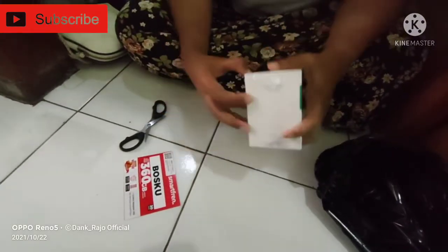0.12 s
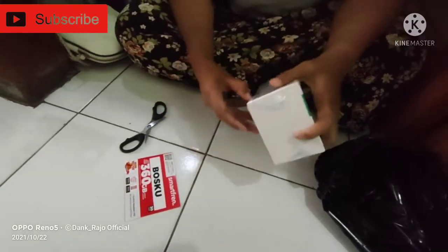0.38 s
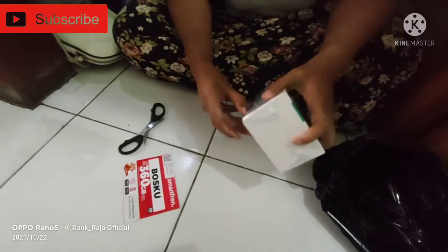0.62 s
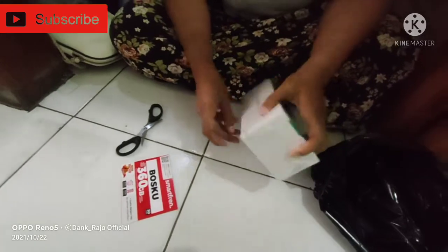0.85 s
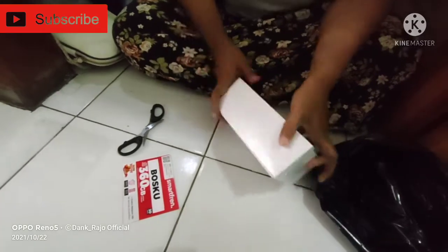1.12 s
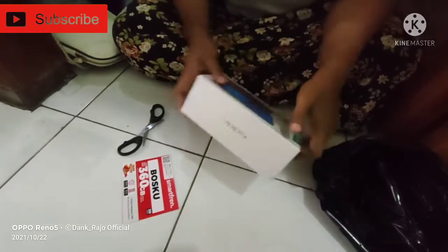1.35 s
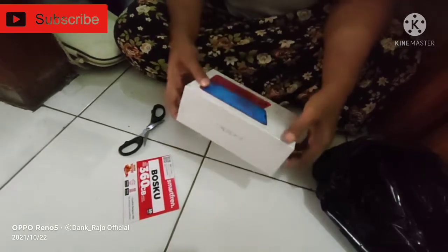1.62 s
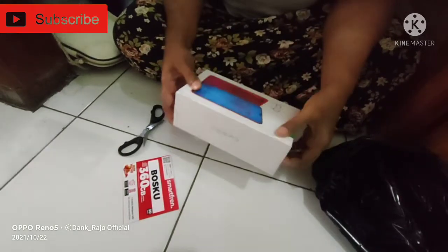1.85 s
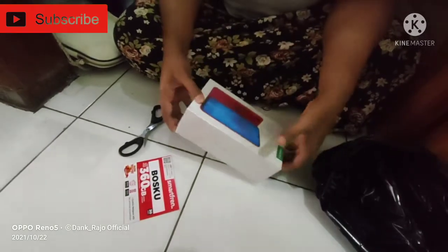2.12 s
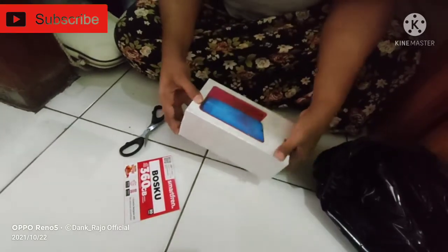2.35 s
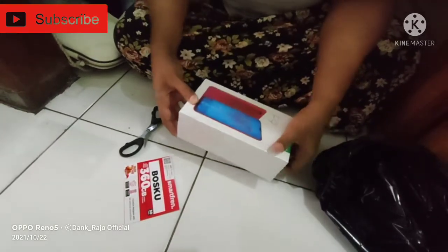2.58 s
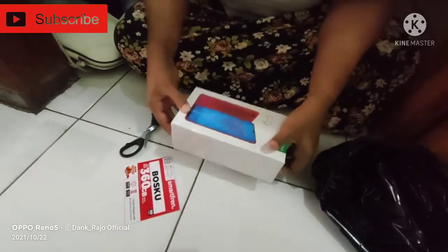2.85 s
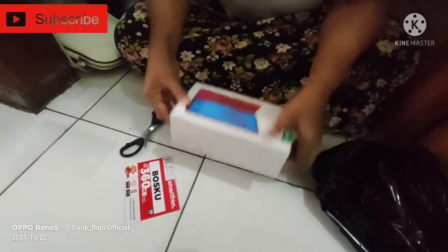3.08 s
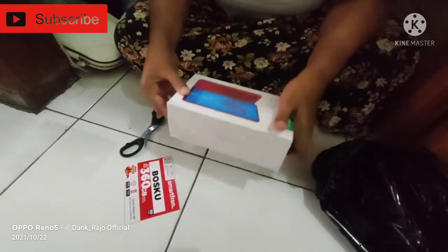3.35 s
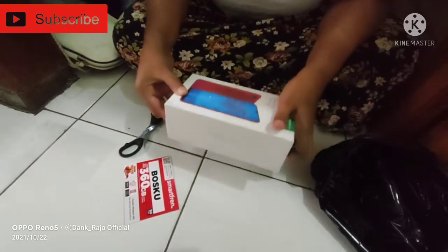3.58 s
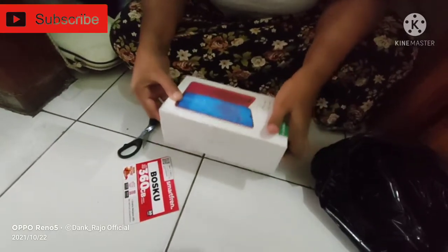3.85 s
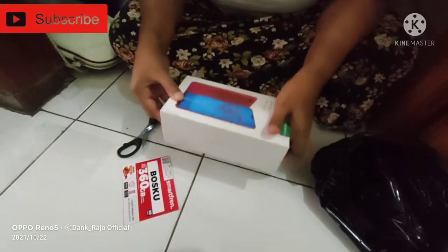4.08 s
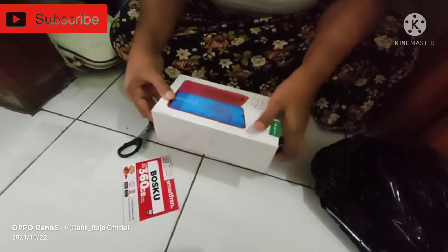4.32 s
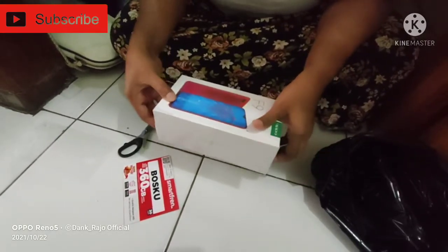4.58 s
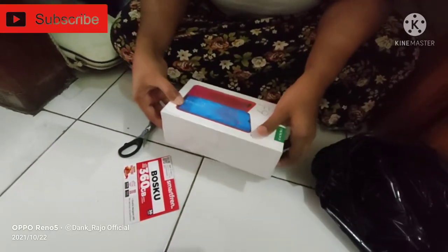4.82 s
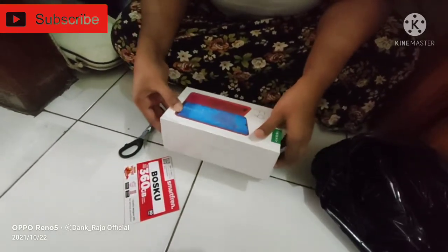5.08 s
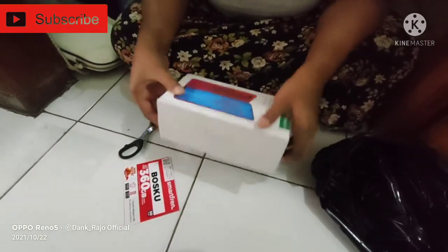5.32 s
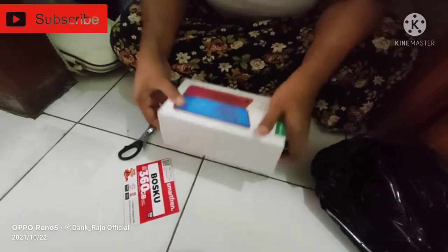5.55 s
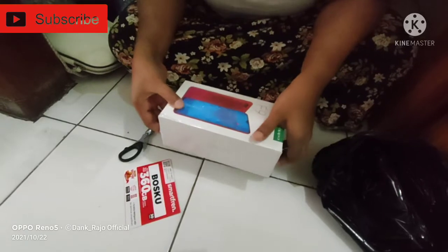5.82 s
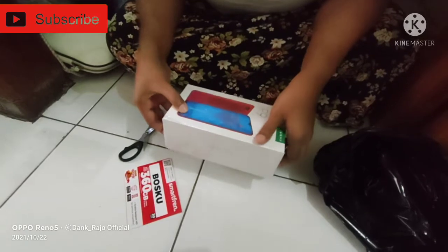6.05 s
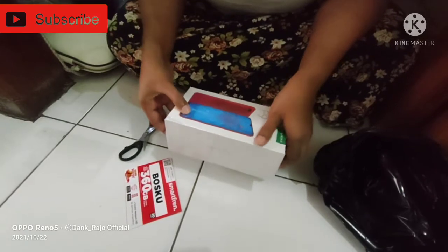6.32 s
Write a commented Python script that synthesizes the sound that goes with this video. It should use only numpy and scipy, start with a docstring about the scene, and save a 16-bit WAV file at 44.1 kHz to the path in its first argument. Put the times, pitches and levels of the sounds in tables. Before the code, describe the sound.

Fingers slip and tap on a light wrapped carton indoors, the card knocking hollowly and its film snapping brightly over faint hiss.

```python
"""A small film-wrapped cardboard box, turned by hand over a tiled floor half a metre from a two-port phone.
Quiet hiss and a faint hum lie under it all. Light slips and taps open, with a firm knock near 1.5 s;
from 2.5 s skin stutters along the ringing card, up to one loud crackle of the wrap at 3.8 s. After a lull come
the hardest knock and a bright crackle at 4.8 s, then scattered crackles and a last tap at 6.3 s.
Knocks ring panel modes, slips drive them with noise, the film ticks; hard walls answer after a short gap."""
import sys
import numpy as np
from scipy import signal
from scipy.fft import rfft, irfft
from scipy.io import wavfile
from scipy.ndimage import uniform_filter1d, map_coordinates

SR = 44100
rng = np.random.default_rng(int(sys.argv[2]) if len(sys.argv) > 2 else 0)


def elevation(decibels):
    """Turn decibel levels (scalar or array-like) into linear amplitude ratios."""
    levels = np.asarray(decibels, float)
    return 10 ** (levels / 20)


def int16_out(signal):
    """Quantize to a 16-bit WAV file."""
    q = np.round(np.clip(np.atleast_2d(signal).T, -1, 1) * 32767)
    wavfile.write(sys.argv[1], SR, q.astype(np.int16))


N = 283563
HZ = np.fft.rfftfreq(N, 1 / SR)
TIME = np.arange(N) / SR

# Room hiss spectrum. Each row: frequency in Hz, relative density in dB per Hz.
HISS_SPECTRUM = [(12, -53), (20, -1.5), (96, -3.5), (168, 3.5), (422, -10.5), (499, -5.5), (542, -14.5),
                 (849, -17), (1120, -11), (1480, -14.5), (2750, -8.5), (5850, -22.5), (8180, -36.5),
                 (13900, -36.5), (16000, -71)]
# Likeness of the hiss at the two ports. Each row: frequency in Hz, likeness from 0 to 1.
HISS_LIKENESS = [(60, 0.4), (130, 0.97), (640, 0), (1400, 0), (15000, 0.2)]
# Tile and wall reflections. Each row: band centre in Hz, relative energy in dB, t60 in seconds.
WALL_BANDS = [(161, -20, 0.36), (440, -7.5, 0.42), (1230, -1, 0.11), (3000, -5.5, 0.29), (7300, -8.5, 0.37),
              (12000, -8, 0.16), (14300, -34, 0.046)]
# Level difference between the ports. Each row: frequency in Hz, left minus right in dB.
PORT_DIFFERENCE = [(60, -0.5), (110, 0.0), (200, 0.5), (380, 1.0), (700, 0.0), (1290, 0.5), (2380, -5.5),
                   (4400, -4.5), (8120, -1.0), (15000, -6.0)]
# Faint narrow swishes. Each row: middle in seconds, half length in seconds, level at the middle in dB, centre in Hz.
SWISH_EVENTS = [(1.077, 0.067, -58.5, 2470), (1.207, 0.07, -56, 3100), (1.173, 0.1, -60, 3700),
                (1.63, 0.066, -54, 3860), (4.047, 0.47, -58, 3500), (5.282, 0.058, -65, 3000),
                (5.349, 0.035, -51.5, 3720), (5.68, 0.047, -60, 4200), (6.25, 0.041, -57.5, 5400)]
# Rustling film spectrum. Each row: frequency in Hz, relative density in dB per Hz.
RUSTLE_SPECTRUM = [(2060, -22), (3500, -19), (5000, 8), (6500, 7.5), (8500, -10), (10900, -1.5),
                   (13800, -9), (16000, -15)]
# Scuffed card face spectrum. Each row: frequency in Hz, relative density in dB per Hz.
SCUFF_SPECTRUM = [(760, 1), (1400, 0.5), (2630, 1.5), (3610, 2.5), (5000, -3), (7000, -12.5), (9000, -31),
                  (13000, -19), (19800, -58)]
# Fingers dragging the box about. Each row: time in seconds, rumble level in dB.
DRAG_LEVEL = [(0, -68), (.29, -51), (.45, -59), (1.4, -58), (1.5, -38), (1.63, -56.5), (1.8, -51),
              (2.0, -60), (2.45, -58.5), (2.6, -49), (2.8, -45.5), (3.0, -47), (3.3, -39.5), (3.45, -49.5),
              (3.6, -47), (3.79, -56.5), (3.95, -60.5), (4.72, -58.5), (4.83, -29), (4.92, -44),
              (5.02, -45.5), (5.1, -38), (5.23, -60), (5.5, -58), (6.0, -69), (6.16, -56.5), (6.43, -65)]
# Strokes of skin over the wrap, swelling and fading.
# Each row: middle in seconds, half length in seconds, scuff level in dB, rustle level in dB.
STROKE_EVENTS = [(0.047, 0.052, -58.5, -64.5), (0.442, 0.062, -50.5, -49.5), (0.565, 0.07, -56, -58),
                 (0.855, 0.25, -71, -62.5), (1.337, 0.073, -47, -54.5), (1.568, 0.2, -66, -63),
                 (2.02, 0.13, -58, -59), (2.316, 0.042, -51, -51), (2.565, 0.099, -59, -58.5),
                 (2.72, 0.18, -69.5, -83), (3.002, 0.095, -61, -81), (3.26, 0.13, -63, -61),
                 (3.61, 0.17, -61, -67.5), (4.242, 0.13, -53, -99), (4.806, 0.025, -37, -58),
                 (4.864, 0.032, -57, -66), (5.006, 0.0093, -48, -45), (5.067, 0.019, -44, -39.5),
                 (5.595, 0.095, -57.5, -69)]
# Panel modes of the box. Each row: frequency in Hz, relative level in dB, free t60 in seconds.
BOX_MODES = [(163, -16, 0.085), (201, 9, 0.12), (257.8, 0.5, 0.032), (300.5, -5, 0.15), (371, -12.5, 0.17),
             (429, -12, 0.09), (446, -13.5, 0.12), (640, -4.5, 0.04), (663, 1, 0.026), (764, -16.5, 0.048),
             (939, -3, 0.018), (1100, -16.5, 0.11), (1734, -6.5, 0.0066), (1750, -28, 0.035),
             (2630, -6.5, 0.012), (3000, -19, 0.067)]
# Skin slipping on the card. Each row: start in seconds, rumble peak in dB, low panel pitch in Hz,
# relative lid level in dB, time to the strongest push in ms (held within 1 to 20).
SLIP_EVENTS = [(0.064, -39, 207, -41, 8.4), (0.411, -41, 185, -3, 9.6), (0.616, -39.5, 242, -8, 12.4),
               (1.287, -37.5, 249, 14, 14), (1.379, -29, 209, -2.5, 4.8), (1.394, -30, 203, -3, 3.7),
               (1.689, -38.5, 200, 12, 2.7), (1.712, -41, 198, -7, 5.5), (1.754, -36, 196, -18, 4.6),
               (1.769, -27, 210, 1, 4.05), (1.801, -40.5, 201, 3, 5), (2.56, -31.5, 238, 3, 4.1),
               (2.599, -36, 210, -6, 4), (2.612, -26.5, 220, -19, 5.8), (2.621, -20.5, 209.6, -8.5, 4.4),
               (2.642, -32, 214, -15, 5), (2.681, -29, 237, -9, 6.7), (2.727, -27, 202, -13, 3.7),
               (2.737, -22.5, 204, -9, 7.9), (2.785, -29, 207, -6, 4.1), (2.827, -41, 167, -5, 2.8),
               (2.838, -22, 182, -15.5, 4.8), (2.899, -35.5, 150, -16, 1.6), (2.932, -28, 161, -12, 8.3),
               (2.962, -33, 180, -3, 2.7), (3.04, -26, 213, -4.5, 4.2), (3.066, -31, 202, -13, 3.5),
               (3.1, -35.5, 202, -7, 4.5), (3.149, -21, 228, -9.5, 13.7), (3.258, -28.5, 200, -11.5, 11),
               (3.28, -20, 229, -8, 6.9), (3.31, -39, 201, -3, 3.6), (3.345, -41, 198, -4, 3.6),
               (3.378, -33.5, 194, -16, 6.7), (3.389, -22.5, 201, -9, 4.7), (3.409, -34, 197, -24, 4),
               (3.457, -39, 199, 10, 4.2), (3.495, -23.5, 201, -11, 4.5), (3.509, -26.5, 206, -2.5, 3.6),
               (3.559, -35, 205, -3, 8.7), (3.616, -32, 184, -10, 4.8), (3.627, -33.5, 154.4, -24, 4.5),
               (3.69, -35.5, 168, 13, 5.5), (4.281, -47, 218, 12, 5.2), (4.402, -45.5, 218, 14, 15),
               (4.44, -46.5, 218, 11, 7.1), (4.751, -33.5, 190, -15, 30), (4.784, -21.5, 201, -7, 19.4),
               (4.849, -31, 198, 0, 6.8), (4.874, -52, 230, -8, 5.4), (4.933, -21.5, 189, -9, 4.8),
               (4.949, -23, 201, -13.5, 4.7), (5.048, -23, 212, -11, 5), (5.069, -24, 150, -16, 4.1),
               (5.094, -33, 201, -32, 5.4), (5.151, -36, 151, -19, 3.7), (6.122, -41, 226, -9, 5.6),
               (6.148, -45, 205, -13, 4.1)]
# Buckles of the wrap. Each row: start in seconds, peak in dB, centre in Hz, then relative levels in dB of
# the body near 1 kHz, the dull part at 2 kHz and the bright part.
CRACKLE_EVENTS = [(0.044, -45, 5240, -20, -15, -17), (0.221, -33.5, 4600, -28, -26, 0),
                  (0.2383, -21.5, 4120, -5, 1, -7), (0.415, -26.5, 3730, -32, -28, -4),
                  (0.468, -33, 4800, -22, -11, -5), (0.609, -34, 4750, -4, 13, -35),
                  (0.663, -41.5, 5170, -20, -15, 2), (0.772, -33, 5940, -25, -9, 6),
                  (0.903, -30.5, 3500, -30, -28, -4.5), (0.927, -38, 5200, -20, -4, -9),
                  (0.939, -36, 2880, 21, 19, -26), (1.008, -40, 3300, -25, -25, -20),
                  (1.263, -17, 4650, -1, -0.5, -2.5), (1.384, -27.5, 3300, -20, -26, -9),
                  (1.394, -21.5, 4600, 8, -6, -5), (1.468, -21.5, 3050, 15, -7, -11),
                  (1.714, -36, 3570, -17, -19, -12), (1.9067, -36, 3600, -19, -21, -10),
                  (2.05, -43, 5940, -25, -20, 4), (2.122, -40.5, 3870, -26, -24, 21),
                  (2.37, -31.5, 5430, -19, -4, -1), (2.4505, -36, 4900, 5, -1, -9),
                  (2.493, -33.5, 4700, 0, -3, -10), (2.54, -30.5, 5040, -6, 1, -3),
                  (2.586, -49, 5030, -20, -10, -11), (2.695, -35.5, 5350, -8, 2, -1),
                  (2.794, -29, 6000, -10, -3, -2), (2.8874, -23.5, 5700, -14, -2, 0.5),
                  (2.9755, -36, 3080, -14, -14, -3), (2.9947, -27, 5630, -29, -12, -7),
                  (3.016, -34, 5450, -12, 1, -18), (3.0629, -34.5, 5930, -33, -24, -2),
                  (3.118, -24, 5840, -15, -3, -9), (3.133, -28, 5450, -17, -11, -12),
                  (3.2286, -28, 2900, 14, -2, -29), (3.5694, -33.5, 2400, 0, 4, -11),
                  (3.634, -37.5, 5900, -17, 1, -5), (3.793, -7.5, 2940, -5, -1.5, -4.5),
                  (3.9724, -39, 3370, -19, -15, -25), (4.1668, -40, 5100, -15, -13, 0),
                  (4.284, -49, 5600, -8, -15, -11), (4.428, -44, 3040, -2, -4, -10),
                  (4.557, -26.5, 5500, -11, 0, 7.5), (4.784, -34, 3500, -7, -3, -9),
                  (4.809, -31, 3070, -9, -10, -14), (4.829, -24, 6140, 0, 0, 22),
                  (4.835, -10, 5960, -7, -2, -2.5), (4.994, -37, 3360, -24, -22, -4),
                  (5.045, -39, 4450, 4, -8, -5), (5.097, -26.5, 4820, 5, 1, -11.5),
                  (5.151, -35, 3200, -30, -28, -14), (5.231, -50, 5970, -27, -20, 3),
                  (5.27, -56, 6000, -25, -19, 5), (5.333, -59, 6100, -25, -27, -3),
                  (5.4, -40, 3400, 8, -5, -15), (5.413, -42, 2000, 0, 2, -12),
                  (5.4328, -21, 5000, -9, -17, -14), (5.6493, -32.5, 4630, 8.5, -16, -5.5),
                  (5.99, -42, 5460, -18, -10, -7), (6.0133, -18, 3380, -18, 0.5, -10.5),
                  (6.127, -38, 3140, 6, 0, -12), (6.139, -39.5, 3000, 5, 2, -16),
                  (6.2599, -30, 3270, 8, 1, -18)]
# Finger taps. Each row: time in seconds, peak in dB, low panel pitch in Hz,
# relative side-panel level in dB, relative lid level in dB.
TAP_EVENTS = [(0.176, -34.5, 247, 15, 6), (0.244, -26.5, 195, -4, -13.5), (0.937, -33, 160, -17, 0),
              (1.468, -13.5, 201, -3, -14), (1.579, -17.5, 216, 5.5, -8.5), (1.946, -40, 205, -9, -13),
              (3.165, -18, 198, -0.5, -6), (3.226, -35, 217, -13, -15), (3.973, -38.5, 145, 2, -1),
              (4.8121, -10.5, 268, 4, -3.5), (4.834, -16.5, 213, -3.5, -32), (6.259, -25.5, 216, 0.5, -2.5)]

HISS_DB, HUM_HZ, HUM_DB = -54.5, 497, -64  # before their slow wavering
WALL_GAP_S, WALL_RISE_S = 0.0052, 0.0047
ECHO_S, ECHO_DB = 0.018, -16
PORT_LEAD_S = 0.00039  # treble of the film and handling reaches the left port first
WANDER_DB, WANDER_S = 1.8, 0.00004  # port level difference and lag per unit of the fingers' wandering
SWISH_OCTAVES = 0.16
STRAY_PER_S, STRAY_DB = 6.9, -52  # rate, middle of the peaks' range
DRAG_SCUFF_DB = -18  # the face's scuff against the dragging rumble
GRIP_DETUNE, GRIP_DB = 0.02, 3  # each grip shifts (as a share) and weights the panels a little
HELD_T60_S = 0.07  # the hand stills the side panels and lid within this
THUD_DB = -11.5  # gain of the jolt below the lowest panel
SLIP_SCUFF_DB = -13  # scuff peak against the rumble peak
SCUFF_DRAG = 2.2  # the scuff fades this many times more slowly than the push
FRAY_MS = 2.5
SHOULDER = 0.4  # share of the bright part's level reached at 1.6 times the centre
BUCKLE_DB, BUCKLE_OCTAVES = 2.5, 0.16  # extra strength around each buckle's centre
PING_DB, PING_MS = -14, 1.1  # least ping against the tick, decay time
CONTACT_MS, YIELD_S = 0.85, 0.00216  # push of a fingertip; the pad yields first
KNOCK_DB, KNOCK_MS, KNOCK_HZ = -20.5, 6.1, 1220  # dry crack of the card, peak against the ring


def level(x, db):
    """Set the rms level."""
    return x * elevation(db) / np.sqrt(np.mean(x ** 2))


def along(points, hz):
    """Read a (Hz, value) table on a log-frequency axis."""
    at, value = np.transpose(points)
    return np.interp(np.log(hz + 1), np.log(at + 1), value)


def colour(x, gain):
    """Multiply the spectrum."""
    return irfft(rfft(x) * gain, N)


def band(x, hz, octaves):
    """Bell-shaped band on a log axis."""
    f = np.fft.rfftfreq(len(x), 1 / SR) + 1
    bell = np.exp(-0.5 * (np.log2(f / hz) / octaves) ** 2)
    return irfft(rfft(x) * bell, len(x))


def add(track, s, sound, peak_db):
    """Mix a sound in at a time with a given peak."""
    i = int(s * SR)
    track[i:i + len(sound)] += (sound * elevation(peak_db) / np.abs(sound).max())[:N - i]


def walk(rate):
    """Random levels held 1 / rate s and slewed; spread near 1."""
    k = int(SR / rate)
    held = np.repeat(rng.standard_normal(N // k + 1), k)
    return uniform_filter1d(held, k)[:N]


def grains(per_s, spread_db):
    """Sparse clicks, most of them small and a few large."""
    when, sign, size = rng.random((3, N))
    return (when < per_s / SR) * np.sign(sign - 0.5) * elevation(-spread_db * np.log(size + 1e-4))


def room():
    """Room hiss that drifts slowly, each octave on its own, alike in the bass only, and a thin wavering hum."""
    alike = np.clip(along(HISS_LIKENESS, HZ), 0, 1)
    spectrum = elevation(along(HISS_SPECTRUM, HZ))
    mid = colour(rng.standard_normal(N), spectrum * np.sqrt(1 + alike))
    side = colour(rng.standard_normal(N), spectrum * np.sqrt(1 - alike))
    octave = np.log2(HZ + 1)
    hiss = np.zeros((2, N))
    for k in range(3, 15):
        window = np.clip(1 - np.abs(octave - k), 0, 1)
        ports = np.array([colour(x, window) for x in (mid + side, mid - side)])
        hiss += elevation(0.11 * walk(2.9)) * ports
    hum_phase = 2 * np.pi * np.cumsum(HUM_HZ + 4.26 * walk(6.6)) / SR
    hum = np.sin(hum_phase) * elevation(HUM_DB + 2.0 * walk(7.0))
    return level(hiss, HISS_DB) * elevation(walk(1.58)) + hum


def walls(x):
    """Dense reflections from tiles and walls set in after a gap; each channel hears its own."""
    t = TIME[:SR // 2]
    rise = np.clip((t - WALL_GAP_S) / WALL_RISE_S, 0, 1)
    shared = rng.standard_normal(len(t))
    out = []
    for own in rng.standard_normal((2, len(t))):
        tail = np.zeros(len(t))
        for hz, db, t60 in WALL_BANDS:
            # long waves reach both ports more alike
            noise = shared + 0.67 * own if hz < 1000 else own
            decay = 1000. ** (-t / t60) / np.sqrt(t60 * SR)
            tail += elevation(db) * decay * band(noise, hz, 0.55)
        out.append(signal.fftconvolve(x, rise * tail * 4)[:N])
    return np.array(out)


def swishes():
    """Short swells of noise in a narrow band."""
    out = np.zeros(N)
    for s, half_s, db, hz in SWISH_EVENTS:
        noise = level(band(rng.standard_normal(N), hz, SWISH_OCTAVES), db)
        out += noise * np.exp(-((TIME - s) / half_s) ** 2)
    return out


def strays():
    """Faint lone ticks of the settling film: decaying noise bursts at random moments."""
    out = np.zeros(N)
    for moment, size, pitch in rng.random((int(STRAY_PER_S * N / SR), 3)):
        tick = np.exp(-TIME[:512] / 0.0048) * rng.standard_normal(512)
        tick = band(tick, 4500 * 2 ** (1.7 * pitch), 1.0)
        add(out, moment * (N / SR - 0.02), tick, STRAY_DB + 8 * (size - 0.5))
    return out


def ring(low_hz, side_db, lid_db):
    """The box's answer to a push: decaying modes; the grip sets the low pitch and each panel's share."""
    t = TIME[:SR // 8, None]
    hz, db, t60 = np.transpose(BOX_MODES)
    hz = np.where(hz < 230, hz * low_hz / hz[1], hz)
    db = db + along([(230, 0), (300, side_db + 11.5), (450, side_db + 4.0), (600, lid_db + 16.0)], hz)
    turn, detune, weight = rng.standard_normal((3, len(hz)))
    hz = hz * (1 + GRIP_DETUNE * detune)
    db = db + GRIP_DB * weight
    held_t60 = np.where(hz > 250, np.minimum(t60, HELD_T60_S), t60)
    modes = elevation(db) * np.sin(2 * np.pi * hz * t + 0.13 * turn) * 1000. ** (-t / held_t60)
    panels = modes.sum(axis=1)
    # the whole box jolts below its lowest panel, where so small a box radiates little
    thud = signal.sosfilt(signal.butter(2, (48, 85), "band", fs=SR, output="sos"), panels)
    radiated = signal.sosfilt(signal.butter(4, 135, "high", fs=SR, output="sos"), panels)
    return radiated + elevation(THUD_DB) * thud


def handling():
    """Dragging skin excites the box modes with grains; strokes scuff the face and make the film tick densely."""
    drag = sum(signal.fftconvolve(grains(700, 3.27), ring(hz, -0.49, -9.5))[:N] for hz in (160, 200, 225))
    scuff = colour(grains(3500, 3.6) * elevation(3 * walk(30)), elevation(along(SCUFF_SPECTRUM, HZ)))
    ticks = colour(grains(2600, 3.7) * elevation(4 * walk(30)), elevation(along(RUSTLE_SPECTRUM, HZ)))
    s, half_s, scuff_db, rustle_db = np.transpose(STROKE_EVENTS)
    swells = np.exp(-((TIME[:, None] - s) / half_s) ** 2)
    pull = elevation(np.interp(TIME, *np.transpose(DRAG_LEVEL)))
    scuff_gain = elevation(DRAG_SCUFF_DB) * pull + swells @ elevation(scuff_db)
    rustle_gain = swells @ elevation(rustle_db)
    return level(drag, 0) * pull + level(scuff, 0) * scuff_gain + level(ticks, 0) * rustle_gain


def slips():
    """Skin stutters along the card in a burst that swells and fades: the box rumbles and its face scuffs."""
    out = np.zeros(N)
    t = TIME[:4096]
    face = elevation(along(SCUFF_SPECTRUM, np.fft.rfftfreq(len(t), 1 / SR)))
    for s, db, low_hz, lid_db, slip_ms in SLIP_EVENTS:
        u = t / (np.clip(slip_ms, 1, 20) / 1000)
        force = rng.standard_normal((2, len(t))) * u * np.exp(1 - u)
        stutter = np.convolve(force[0] * np.abs(force[1]) ** 1.06, np.hanning(16))
        add(out, s, signal.fftconvolve(stutter, ring(low_hz, -0.75, lid_db)), db)
        # cubed noise is gritty: a few catches stand out
        grit = rng.standard_normal(len(t)) ** 3 * u * np.exp(-u / SCUFF_DRAG)
        add(out, s, irfft(rfft(grit) * face), db + SLIP_SCUFF_DB)
    return out


def crackles():
    """Each buckle of the film is a hard tick fraying into noise, with a brief ping at its centre."""
    out = np.zeros(N)
    f = np.fft.rfftfreq(1024, 1 / SR)
    for s, db, hz, body_db, dull_db, bright_db in CRACKLE_EVENTS:
        snap = np.exp(-TIME[:1024] / (FRAY_MS / 1000)) * rng.standard_normal(1024)
        snap[0] = 2.5  # the hard tick
        tone = rfft(np.roll(snap, 40))
        tone /= uniform_filter1d(np.abs(tone), size=11)  # even out before shaping
        shape = along([(300, body_db - 22.0), (1300, body_db), (2000, dull_db), (hz, 4),
                       (1.6 * hz, SHOULDER * bright_db), (8500, bright_db), (14500, bright_db),
                       (17000, bright_db - 39)], f)
        shape += BUCKLE_DB * np.exp(-0.5 * (np.log2((f + 1) / hz) / BUCKLE_OCTAVES) ** 2)
        add(out, s, irfft(tone * elevation(shape)), db)
        ping = np.sin(2 * np.pi * hz * TIME[:512]) * np.exp(-TIME[:512] / (PING_MS / 1000))
        # the duller the buckle, the stronger its ping
        add(out, s + 40 / SR, ping, db + PING_DB + np.clip(-0.7 * bright_db, 0, 10))
    return out


def taps():
    """A fingertip pushes for about a millisecond, the card cracks dryly and the panels ring."""
    out = np.zeros(N)
    push = np.sin(np.pi * np.minimum(TIME[:256] / (CONTACT_MS / 1000), 1))
    for s, db, low_hz, side_db, lid_db in TAP_EVENTS:
        add(out, s + YIELD_S, np.convolve(push, ring(low_hz, side_db, lid_db)), db)
        crack = np.roll(np.exp(-TIME[:2048] / (KNOCK_MS / 1000)) * rng.standard_normal(2048), 40)
        add(out, s + YIELD_S, band(crack, KNOCK_HZ, 0.75), db + KNOCK_DB)
    return out


def scene():
    """Direct sound reaches the two ports with a lag and a shadow; walls and room are added."""
    box = taps() + slips()
    film = crackles() + strays() + handling() + swishes()
    near = box + film
    # the fingers work now left, now right of the phone
    where = walk(26)
    lean = elevation(WANDER_DB * where / 2)
    left, right = (map_coordinates(film, [(TIME + k * WANDER_S * where / 2) * SR], mode="nearest")
                   for k in (1, -1))
    shadow = elevation(along(PORT_DIFFERENCE, HZ) / 2)  # half the difference for each port
    treble = np.clip((HZ - 900) / 1200, 0, 1)
    lead = shadow * np.exp(1j * np.pi * HZ * PORT_LEAD_S * treble)
    direct = np.array([colour(box, shadow) + colour(left * lean, lead),
                       colour(box, 1 / shadow) + colour(right / lean, 1 / lead)])
    # the nearest wall sends back one distinct treble echo
    echo = elevation(ECHO_DB) * np.exp(-2j * np.pi * HZ * ECHO_S) * np.clip(HZ / 3000, 0, 1)
    far = walls(near) + colour(near, echo) + room()
    return direct + np.array([colour(far[0], shadow), colour(far[1], 1 / shadow)])


def band_limit(x):
    """A steep low-pass at the top of the band."""
    return signal.sosfilt(signal.butter(12, 16820, fs=SR, output="sos"), x)


def record(dry):
    """The phone cuts the top steeply above 16.5 kHz."""
    mix = signal.sosfilt(signal.ellip(8, 0.2, 60, 16500, fs=SR, output="sos"), dry)
    return band_limit(mix)


dry = scene()
out = record(dry)
int16_out(out)
```